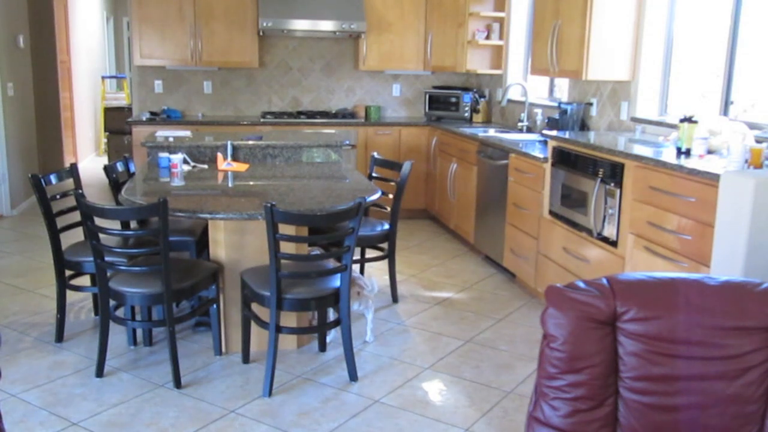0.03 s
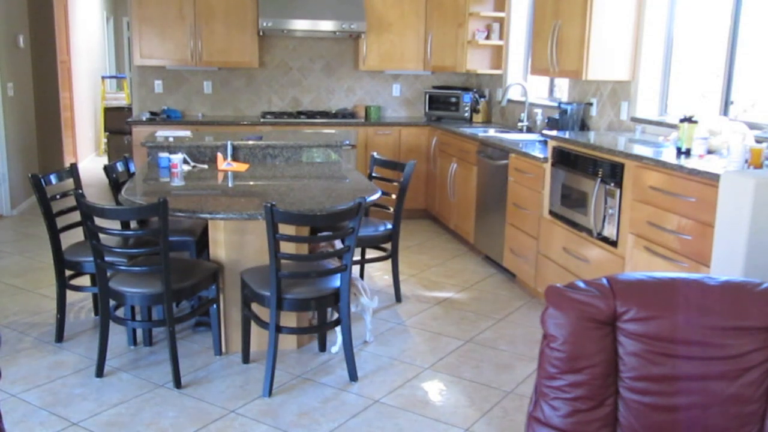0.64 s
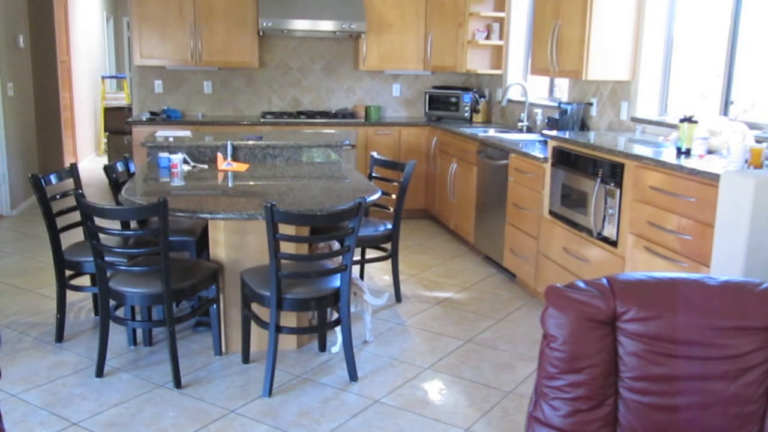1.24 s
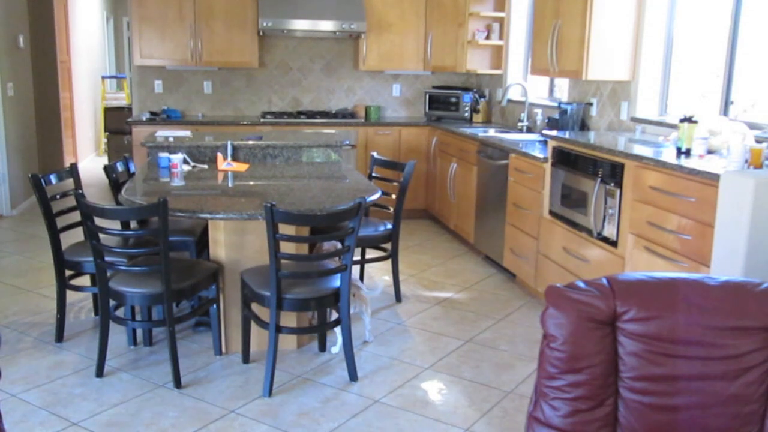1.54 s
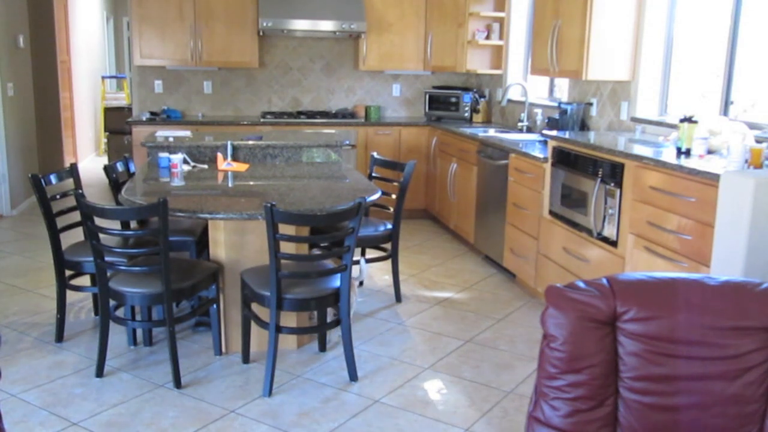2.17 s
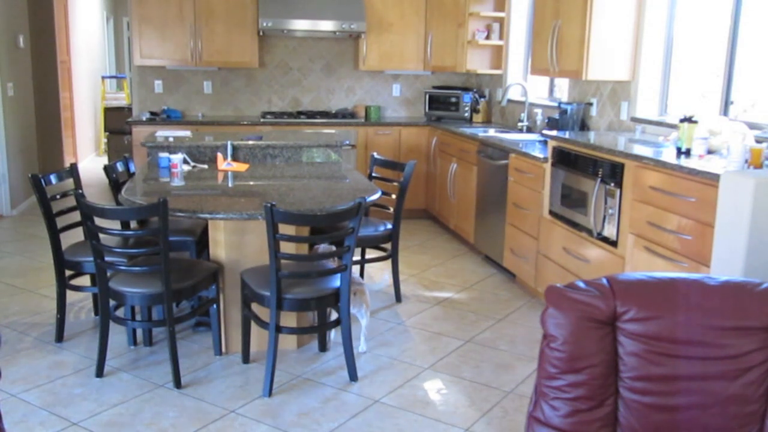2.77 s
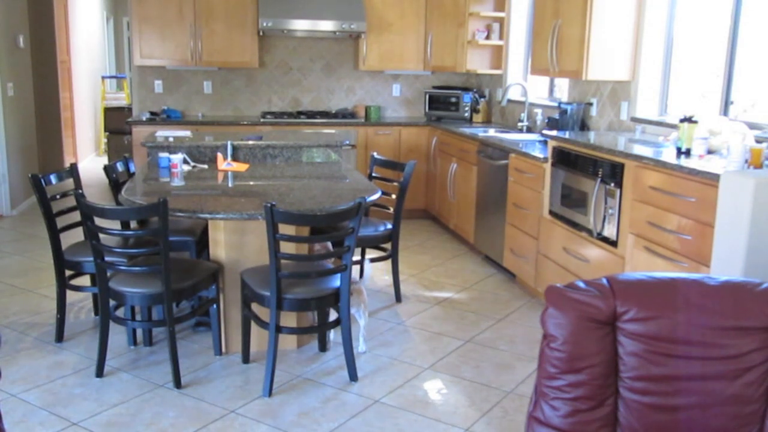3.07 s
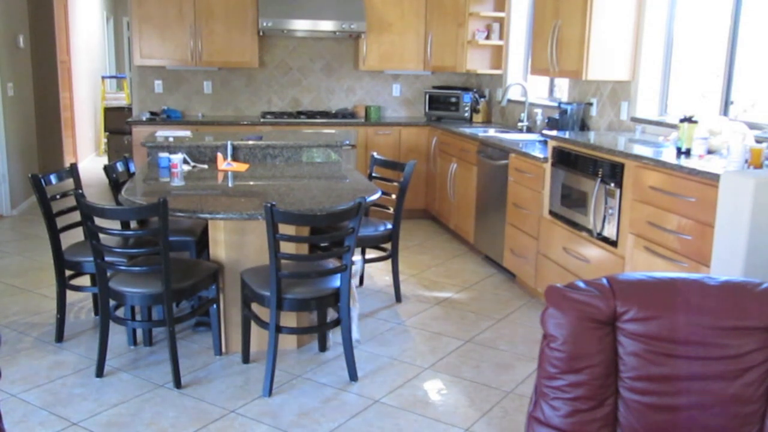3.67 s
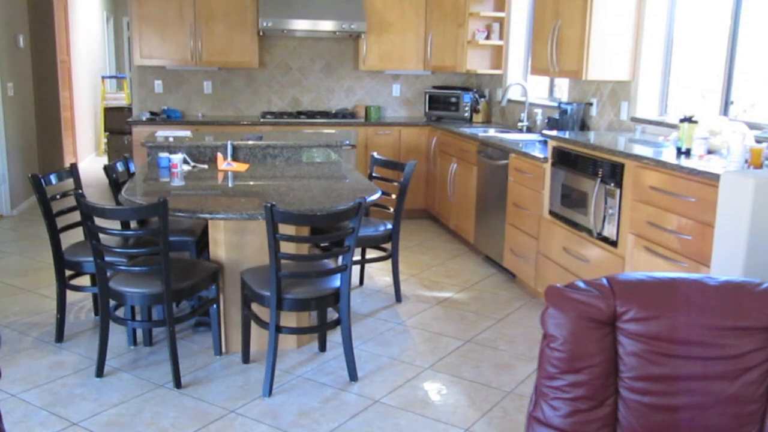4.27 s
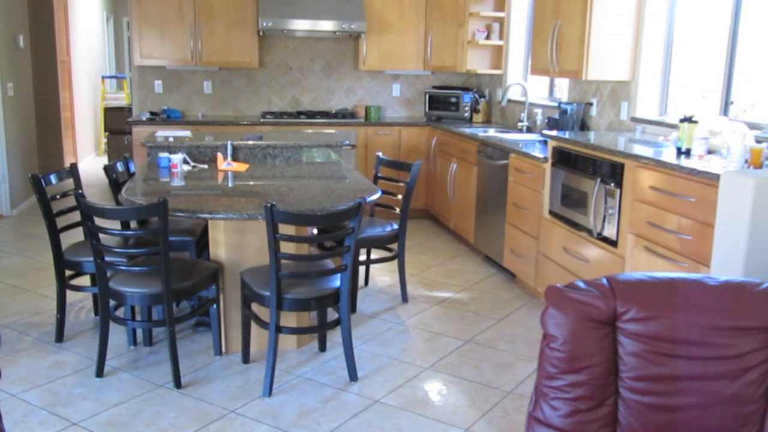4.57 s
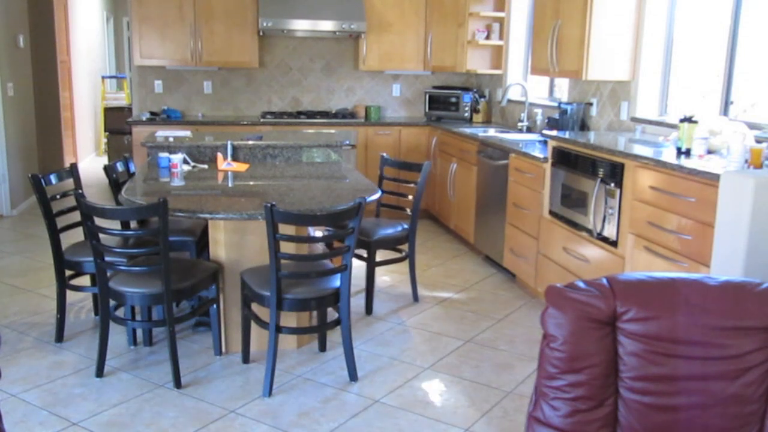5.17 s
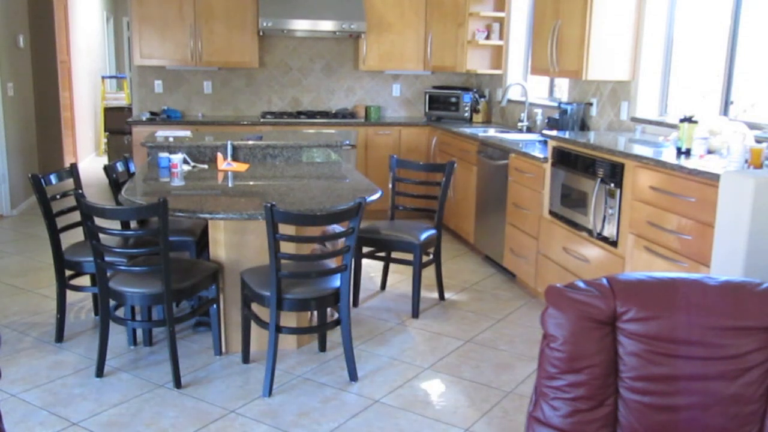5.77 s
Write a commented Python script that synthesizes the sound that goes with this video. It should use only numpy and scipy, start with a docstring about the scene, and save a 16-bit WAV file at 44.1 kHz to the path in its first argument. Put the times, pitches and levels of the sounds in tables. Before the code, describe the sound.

Heard from across a quiet kitchen with a little echo, chair legs give a short, low scraping groan on the tiles. Scattered light, hard clicks and faint brief squeaks follow over a soft refrigerator hum. Then the wooden chair moves again, first in soft, halting scrapes, then in a longer gritty drag that swells to a loud groan and dies away.

```python
"""A wooden chair is shoved over the tiles of a quiet kitchen: its feet stick and slip, so the frame
groans on its low modes while grit rasps under the legs. In the pause that follows, small hard clicks
sound from behind the table. Then comes a hesitant pull, and last a long one that bears down into a loud
groan. Brief squeaks and a few more clicks dot the scene; a refrigerator hums throughout."""
import sys
import numpy as np
from scipy import signal
from scipy.fft import rfft, irfft, next_fast_len
from scipy.io import wavfile
from scipy.ndimage import map_coordinates

SR = 44100
rng = np.random.default_rng(int(sys.argv[2]) if len(sys.argv) > 2 else 0)


def master(y):
    """Save y as 16-bit WAV."""
    cut = np.clip(np.atleast_2d(y).T, -1, 1)
    pcm = np.round(cut * 32767)  # scale
    wavfile.write(sys.argv[1], SR, pcm.astype(np.int16))


N = 265041
TIME = np.arange(N) / SR
SWINGS_PER_SLIP = 2


# catches of the feet: (time [s], rise [s], hold [s], t60 [s], pitch [Hz], level [dB], subharmonic [dB])
CATCHES = [(0.0, 0.031, 0.054, 0.13, 249.9, -20, -39), (0.092, 0.048, 0.069, 0.36, 242.8, -21.5, -33.5),
           (4.443, 0.11, .01, 0.54, 242.9, -34.5, -57), (4.589, .045, 0.018, .25, 238.8, -31, -49.5),
           (4.733, 0.04, 0.022, 0.32, 247.8, -34.5, -50), (4.79, 0.071, 0.021, 0.3, 239.5, -29.5, -48),
           (4.981, .04, 0.018, 0.29, 238.4, -46.5, -68), (5.133, 0.097, 0.023, 0.18, 240, -34, -58),
           (5.446, 0.081, .02, .3, 245.2, -32.5, -44), (5.507, 0.078, 0.029, .2, 244.8, -14, -37.5),
           (5.68, 0.032, 0.021, 0.28, 240.4, -23, -31.5), (5.765, 0.021, 0.028, .15, 247.6, -29, -34.5),
           (5.799, 0.025, 0.014, 0.48, 244.9, -29, -60)]
# overtones of the groan: (ratio to the frame's pitch, relative level [dB])
GROAN_PARTIALS = [(1.5, -23.5), (2.0, -32)]
def groan(cycles, rough_db=1.16):
    """Period doubling: a slip on every second swing adds overtones and the octave below to the frame."""
    frame_gain, below_gain = 0, 0
    for start, rise, hold, t60, _, frame_db, below_db in CATCHES:
        shape = swell(start, rise, hold, t60)
        frame_gain = np.maximum(frame_gain, amp(frame_db) * shape)
        below_gain = np.maximum(below_gain, amp(below_db) * shape)
    note = amp(rough_db * drift(65)) * tone(cycles)
    overtones = sum(amp(db + 2 * drift(50)) * tone(cycles * ratio + 0.095 * drift(45))
                    for ratio, db in GROAN_PARTIALS)
    below = amp(0.77 * drift(32)) * tone(cycles / SWINGS_PER_SLIP + 0.027 * drift(25))
    return frame_gain * (note + overtones) + below_gain * below


def chair():
    """Stick-slip oscillation: one cycle, gliding in pitch from catch to catch, drives groan and scrape."""
    pitch, = in_time([(start + rise, hz) for start, rise, _, _, hz, _, _ in CATCHES])
    cycles = np.cumsum(pitch * (1 + 0.008 * drift(60))) / SR
    return groan(cycles) + scrape(cycles) + chatters()


def friction(cycles, load, lock_load=0.5, full_load_share=0.39):
    """Phase locking: above a threshold load, a growing share of slips falls in step with the frame."""
    locked = np.clip(full_load_share * (load - lock_load) / (1 - lock_load), 0, 1)
    releases = np.diff(np.floor(cycles / SWINGS_PER_SLIP + 0.024 * drift(120)), prepend=0)
    slips = rms_one(releases * amp(3.5 * drift(110)))
    return np.sqrt(locked) * slips + np.sqrt(1 - locked) * grains(per_s=700, spread_db=0)


# sliding speed in the shove and in the pulls, as the level of the rasp: (time [s], level [dB])
SHOVE_SPEED = [(0, -38), (.02, -42.5), (.13, -45), (.27, -54), (.42, -66.5), (.6, -92)]
PULL_SPEED = [(4.25, -85), (4.34, -60), (4.69, -51.5), (4.88, -54), (5.08, -67.5), (5.16, -54),
              (5.3, -44.5), (5.43, -43), (5.58, -44.5), (5.65, -49), (5.7, -46), (5.83, -53), (6.01, -67.5)]
# how hard the feet bear on the tiles: (time [s], load [0-1])
FOOT_LOAD = [(0, 1), (.14, 0.78), (.27, 0.64), (.6, 0.9), (4.3, 0.16), (5.3, 0.11), (5.43, 0.62),
             (5.5, 0.48), (5.57, 1), (5.68, 1), (5.9, .7)]
# spectra of the judder, the rasp and the crushed grit: (frequency [Hz], relative level [dB])
JUDDER_SPECTRUM = [(103, -32), (121, 1), (200, 1.5), (280, 5.5), (380, -3), (500, -2.5), (700, -7),
                   (1000, -20.5), (1500, -24), (3000, -63)]
RASP_SPECTRUM = [(600, -3.5), (1100, -7), (1500, -4), (1950, -1), (2400, -5.5), (3000, -7), (4000, -9),
                 (7000, -28)]
GRIT_SPECTRUM = [(1800, -2), (3400, 5), (4500, 0.5), (6000, 1), (8000, -1), (9800, 1), (11000, -8),
                 (12500, -15), (15500, -30)]
def scrape(cycles):
    """Sliding friction: speed sets the level, and load turns a gritty hiss into a low judder."""
    speed_db, = in_time(SHOVE_SPEED + PULL_SPEED)
    load, = in_time(FOOT_LOAD)
    judder_db, grit_db = 1.5 + 15 * load, -2.5 - 1.5 * load  # relative to the rasp
    force = friction(cycles, load)
    judder = amp(judder_db) * through_chair(force, JUDDER_SPECTRUM, wet_db=-1.5)
    rasp = through_chair(grains(per_s=1200, spread_db=-1), RASP_SPECTRUM, wet_db=0)
    # a few coarse grains tick among the fine ones
    sand = grains(per_s=3000, spread_db=0.5) + 0.12 * grains(per_s=130, spread_db=4)
    grit = amp(grit_db) * through_chair(sand, GRIT_SPECTRUM, wet_db=-5.5)
    return amp(speed_db) * (judder + rasp + grit) + barks(force)


# resonances of the chair: (frequency [Hz], bandwidth [Hz], gain over the broad response [dB])
WOOD_MODES = [(300, 18, 3.5), (393, 9.2, 3), (467, 17, 4.5), (532, 18, -7), (586, 13, -1), (653, 5.9, 7),
              (728, 27, 1), (870, 29, 3.5), (962, 40, 7.5), (1241, 5.6, 12.5), (1325, 24, 9.5),
              (1460, 18, 4), (1920, 190, 4), (2638, 44, 8.5), (3520, 61, 5), (3900, 72, -3.5)]
def through_chair(force, spectrum, wet_db, room_t60=0.77):
    """Modal response: force at the feet rings the wood, which radiates into the kitchen; rms 1."""
    rung = force + sum((amp(db) - 1) * resonance(force, hz, width) for hz, width, db in WOOD_MODES)
    echoes = signal.fftconvolve(rung, room_tail(room_t60))[:N]
    return colour(rung + amp(wet_db) * echoes, spectrum)


# notes of single legs and rails: (time [s], rise [s], hold [s], t60 [s], pitch [Hz], level [dB])
LEG_NOTES = [(0.0, 0.01, 0.011, .16, 293.4, -19.5), (0.0, 0.0066, .012, 0.26, 157, -32.5),
             (0.031, 0.029, .01, .3, 381.5, -39), (0.08, 0.023, .012, 0.42, 296, -29),
             (0.12, .03, 0.039, 0.21, 159.5, -42), (4.38, 0.13, .012, 0.37, 161, -34),
             (5.13, .07, 0.018, 0.7, 160, -40.5), (5.375, 0.038, 0.01, 0.26, 381, -38),
             (5.499, 0.063, 0.014, 0.34, 381, -29.5), (5.645, .025, 0.0047, 0.3, 378.6, -33.5),
             (5.693, 0.066, 0.017, .2, 160, -42), (5.764, 0.023, 0.0085, 0.38, 382.3, -39)]
def chatters(rough_db=1.3, wobble=0.016):
    """Beating: legs and rails chatter at wavering pitches of their own against the frame's note."""
    clock = np.cumsum(1 + wobble * drift(60)) / SR
    notes = sum(amp(db) * swell(start, rise, hold, t60) * tone(hz * clock + rng.random())
                for start, rise, hold, t60, hz, db in LEG_NOTES)
    return notes * amp(rough_db * drift(55))


# a foot digs in: (time [s], rise [s], hold [s], t60 [s], level [dB])
DIGS = [(0.0, .012, 0.017, 0.63, -50), (5.676, 0.033, 0.019, 0.78, -39.5)]
# spectrum of the bark: (frequency [Hz], relative level [dB])
BARK_SPECTRUM = [(700, 0), (1150, 11), (1350, 7), (1950, 4.5), (2400, 2), (3200, -35)]
def barks(force):
    """Forced vibration: friction at a foot that digs in draws a dull bark from the wood."""
    digging = sum(amp(db) * swell(start, rise, hold, t60) for start, rise, hold, t60, db in DIGS)
    return digging * through_chair(force, BARK_SPECTRUM, wet_db=9.5)


# small hard clicks: (time [s], relative snap level [dB], snap pitch [Hz], relative knock level [dB])
HARD_CLICKS = [(0.3183, -44.5, 7300, -50), (0.3746, -38, 9650, -52), (1.7382, -44.5, 7860, -52.5),
               (1.9908, -38, 9400, -55.5), (2.1805, -50.5, 9700, -53.5), (2.265, -37, 9800, -65),
               (2.3076, -39.5, 8300, -49.5), (2.4823, -45.5, 9310, -55), (2.5445, -40.5, 9550, -52),
               (2.576, -40, 9500, -47), (2.6905, -46, 8590, -53), (2.709, -43, 8900, -54),
               (3.574, -49, 8550, -53.5), (3.7123, -38, 8800, -47.5), (3.902, -42, 9450, -55),
               (3.9622, -40.5, 9260, -54), (4.072, -39, 9580, -56), (4.2028, -28, 9200, -38.5),
               (4.2397, -52, 9610, -40), (4.3618, -46, 8000, -45.5), (4.5016, -45, 9080, -57),
               (5.6449, -47.5, 6130, -42), (5.784, -35.5, 8900, -45)]
# sound paths from behind the table: (delay [s], relative level [dB])
CLICK_PATHS = [(0, -7), (.0035, -14), (0.0103, 2.5), (0.0146, -4)]
def clicks(snap_gain_db=26, knock_gain_db=30, paths_db=-10, crack_db=-12):
    """Acoustic shadow: the table hides the clicks, so reflections arrive stronger than direct sound."""
    out = np.zeros(N + SR)
    for start, snap_db, snap_hz, knock_db in HARD_CLICKS:
        early = 0.45 * room_tail(t60=0.16, build_s=0.0013)
        for delay, db in CLICK_PATHS:
            early[round(delay * SR)] += amp(db + paths_db)
        arrivals = early + room_tail(t60=0.43)
        broad = 0.82 * band(arrivals, 0.75 * snap_hz, 1.327 * snap_hz)
        ring = 0.96 * resonance(arrivals, snap_hz, width=1030)
        snap = band(broad + ring, 1500, 10660, order=6)
        # air and walls soak up the top octave quickly
        crack = amp(crack_db) * band(room_tail(t60=0.19, build_s=0.001), 6500, 12200)
        knock = band(room_tail(t60=0.53, build_s=0.0011), 1400, 6400)
        click = amp(snap_db + snap_gain_db) * (snap + crack) + amp(knock_db + knock_gain_db) * knock
        onset = round(start * SR)
        out[onset:onset + len(click)] += click
    return out[:N]


# hard things rubbing: (time [s], frequency [Hz], bandwidth [Hz], level [dB], t60 [s])
RUBS = [(0.105, 4130, 600, -47.5, 0.44), (0.319, 5660, 600, -66, 0.16), (2.266, 5550, 900, -62, .3),
        (3.961, 5350, 1310, -54, 0.42), (5.647, 6004, 450, -48, 0.093)]
def squeaks(rise_s=0.002):
    """Frictional excitation: a brief rub starts a rough, narrow ring that dies away in the room."""
    out = 0
    for start, hz, width, db, t60 in RUBS:
        age = np.maximum(TIME - start, 0)
        ring = rms_one(band(rng.standard_normal(N), hz - width / 2, hz + width / 2))
        out += ring * amp(db - 60 * age / t60) * (1 - np.exp(-age / rise_s))
    return out


# partials of the refrigerator: (frequency [Hz], level [dB])
HUM_PARTIALS = [(59.8, -80), (119.7, -54.5), (172, -64.5), (176, -77), (204.6, -63), (239.4, -71),
                (371, -70.5), (378, -70), (616, -72)]
def refrigerator():
    """Line spectrum: the hum is a sum of low tones, each wavering slightly in level and phase."""
    return sum(amp(db + 0.2 * drift(2.52)) * tone(hz * TIME + 0.011 * drift(3.27) + rng.random())
               for hz, db in HUM_PARTIALS)


# faint high whine: (frequency [Hz], bandwidth [Hz], level [dB])
WHINE_BANDS = [(7670, 120, -78), (9090, 540, -69.5), (9700, 570, -78.5)]
# still air of the room: (frequency [Hz], relative level [dB])
AIR_SPECTRUM = [(12, -47), (20, -9.5), (64, -7.5), (95, -11.5), (122, -6), (161, -4.5), (196, -7.5),
                (274, -8), (382, -4), (505, -12), (614, -12), (2330, -24), (6360, -29.5), (9130, -27.5),
                (15500, -43)]
def room_tone(air_db=-53.5):
    """Noise floor: a narrow-band whine lies over the broadband noise of the still room."""
    whine = sum(amp(db) * rms_one(resonance(rng.standard_normal(N), hz, width))
                for hz, width, db in WHINE_BANDS)
    return whine + amp(air_db) * colour(rng.standard_normal(N), AIR_SPECTRUM)


def room_tail(t60, build_s=0.004):
    """Reverberation: diffuse reflections from tile and cabinets, of unit energy."""
    t = TIME[:SR // 2]
    tail = rng.standard_normal(len(t)) * amp(-60 * t / t60) * (1 - np.exp(-t / build_s))
    return tail / np.sqrt(np.sum(tail ** 2))


def swell(start, rise, hold, t60):
    """Envelope: a smooth rise to one, a hold and an exponential decay."""
    age = TIME - start
    attack = np.sin(np.pi / 2 * np.clip(age / rise, 0, 1)) ** 2
    return attack * amp(-60 * np.clip((age - rise - hold) / t60, 0, 2))


def grains(per_s, spread_db):
    """Shot noise: tiny impacts at random times; rms 1."""
    sizes = amp(spread_db * np.minimum(rng.exponential(1, N), 4)) * rng.choice([-1, 1], N)
    return rms_one(sizes * (rng.random(N) < per_s / SR))


def drift(rate):
    """Random modulation: a smooth curve of rms 1 that changes about rate times a second."""
    knots = rng.standard_normal(4000)
    return rms_one(map_coordinates(knots, [TIME * rate + 2], order=3, mode="wrap"))


def colour(x, spectrum):
    """Spectral shaping: weight a steady signal by a broad curve; rms 1."""
    hz, db = np.transpose(spectrum)
    size = next_fast_len(N)
    bin_hz = np.maximum(np.arange(size // 2 + 1) * SR / size, 1)
    gain = amp(np.interp(np.log(bin_hz), np.log(hz), db, left=-90, right=-90))
    return rms_one(irfft(rfft(x, size) * gain, size)[:N])


def resonance(x, hz, width):
    """Damped oscillator: two poles, with gain 1 at the peak."""
    radius = np.exp(-np.pi * width / SR)
    feedback = [1, -2 * radius * np.cos(2 * np.pi * hz / SR), radius ** 2]
    return signal.lfilter(np.array([1, 0, -1]) * (1 - radius ** 2) / 2, feedback, x)


def band(x, low_hz, high_hz, order=2):
    """Causal band-pass filter."""
    return signal.sosfilt(signal.butter(order, [low_hz, high_hz], "band", fs=SR, output="sos"), x)


def tone(cycles):
    """Harmonic motion: a sine of rms 1 along a count of cycles."""
    return np.sqrt(2) * np.sin(2 * np.pi * cycles)


def in_time(rows):
    """Linear interpolation of each column, sample by sample."""
    times, *columns = np.transpose(rows)
    return [np.interp(TIME, times, column) for column in columns]


def amp(db):
    """Decibels to gain."""
    return 10 ** (np.asarray(db) / 20)


def rms_one(x):
    """Normalisation to unit power."""
    return x / np.sqrt(np.mean(x ** 2) + 1e-20)


def scene():
    """Superposition: all sources add at one point across the room."""
    return (chair() + clicks() + squeaks() + refrigerator() + room_tone())[None, :]


def record(dry, cutoff_hz=15750):
    """Band limiting: a steep low-pass removes the highest treble."""
    return signal.sosfilt(signal.ellip(12, 0.1, 90, cutoff_hz, fs=SR, output="sos"), dry)


dry = scene()
out = record(dry)
master(out)
```